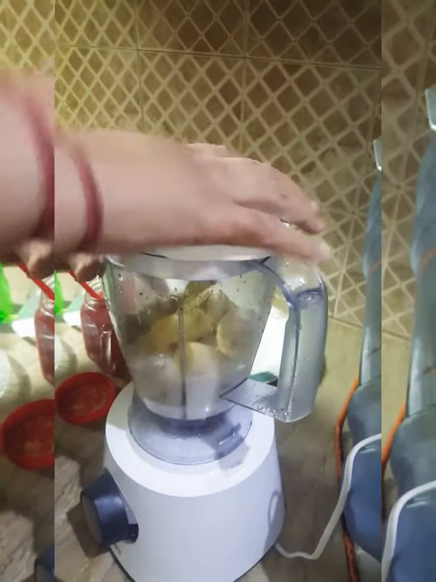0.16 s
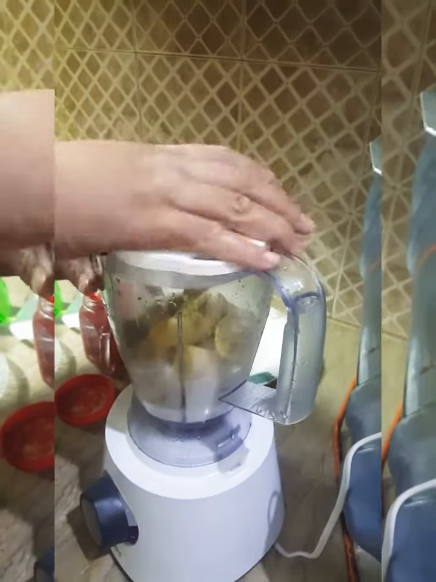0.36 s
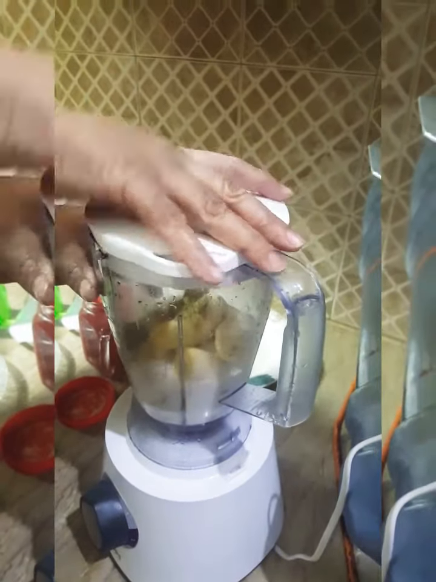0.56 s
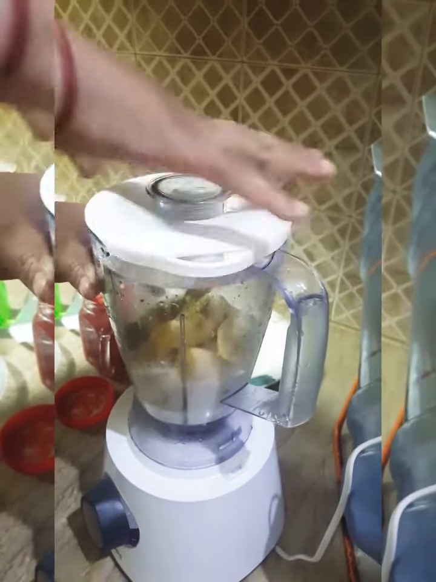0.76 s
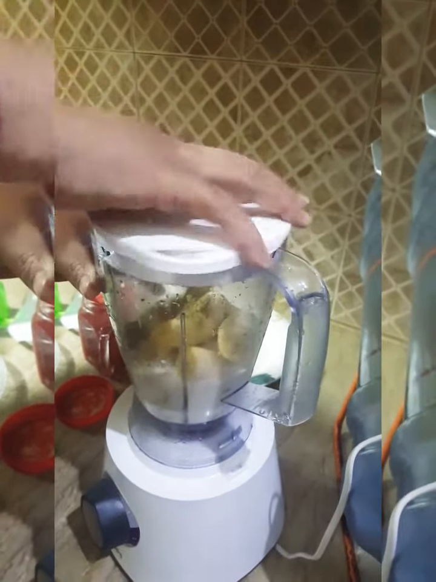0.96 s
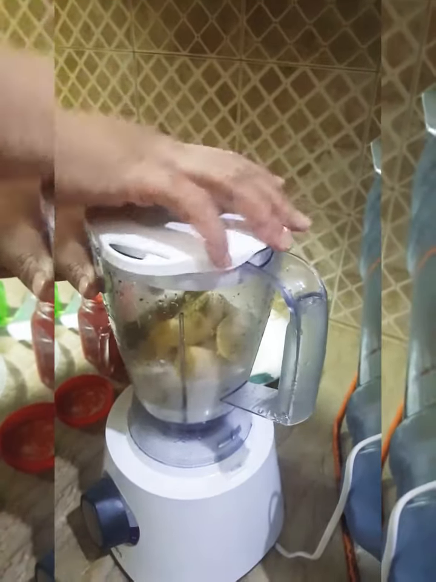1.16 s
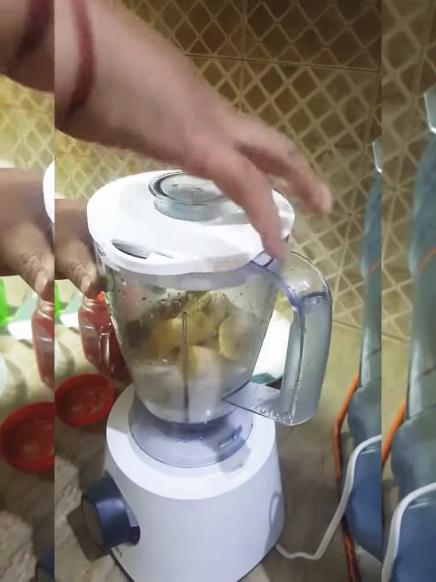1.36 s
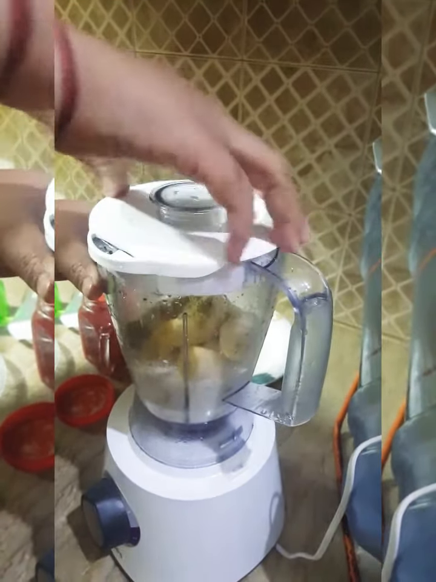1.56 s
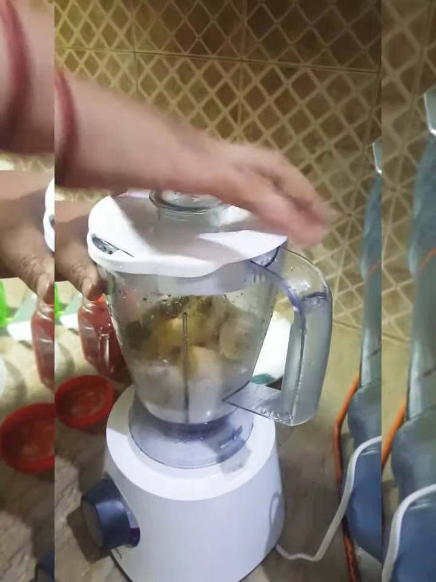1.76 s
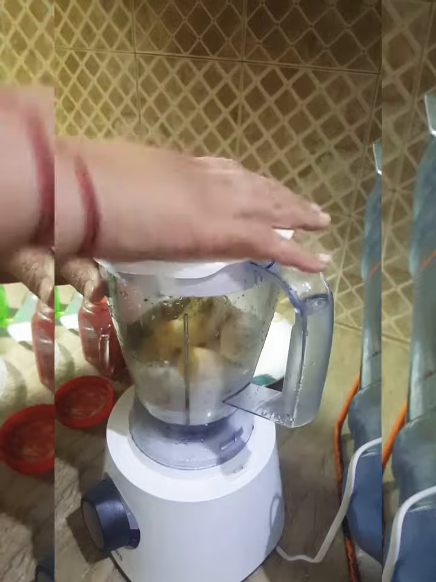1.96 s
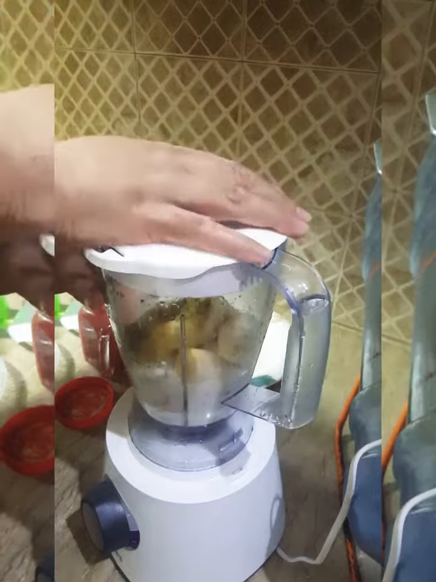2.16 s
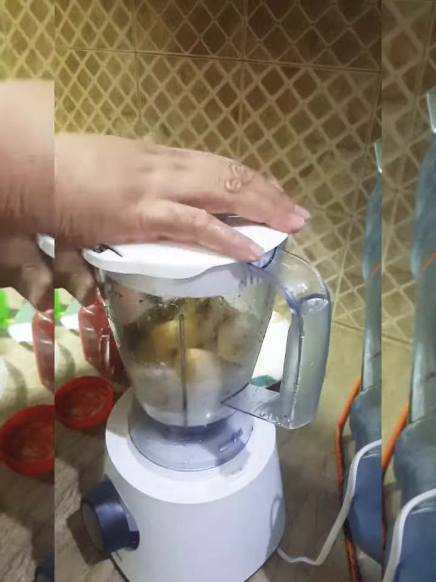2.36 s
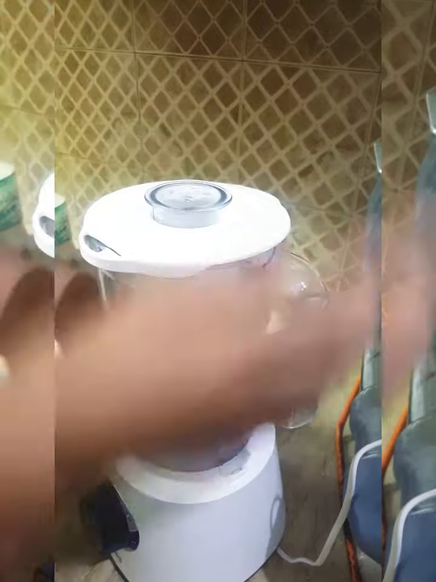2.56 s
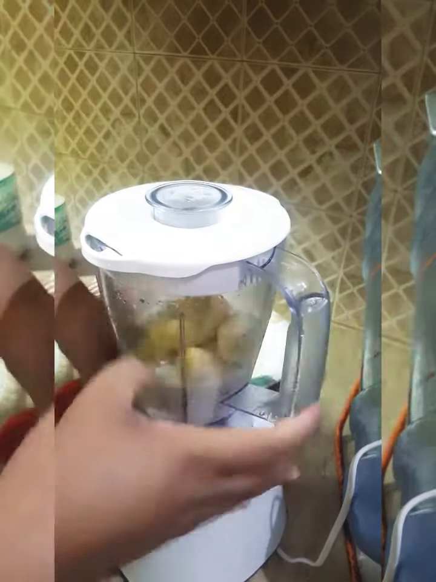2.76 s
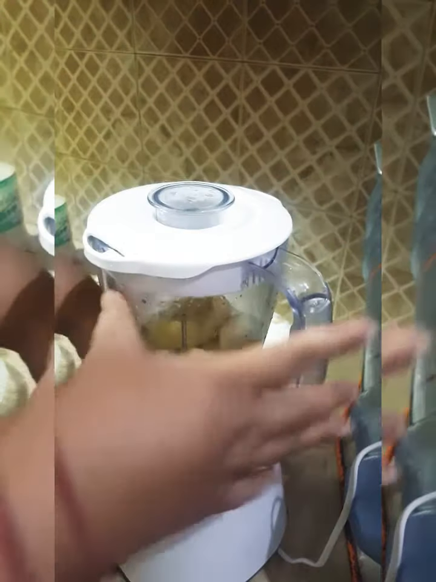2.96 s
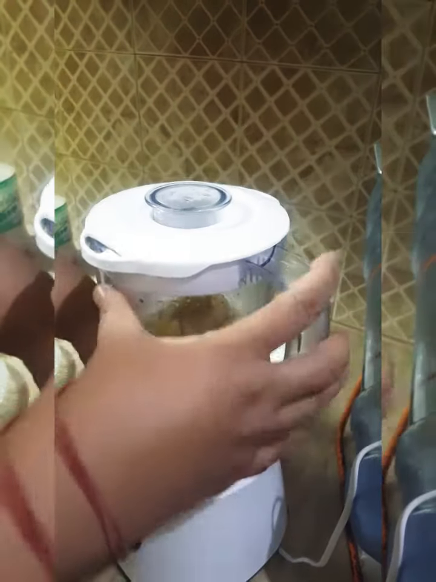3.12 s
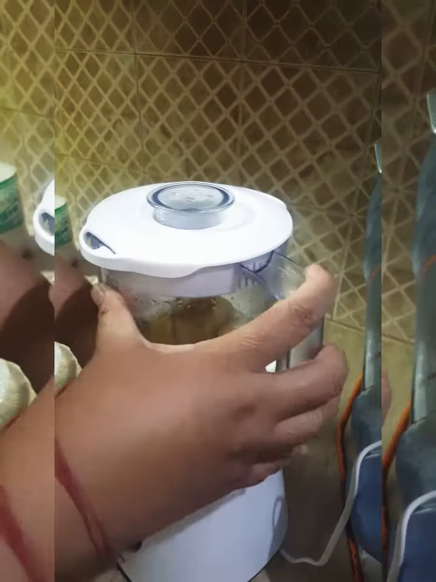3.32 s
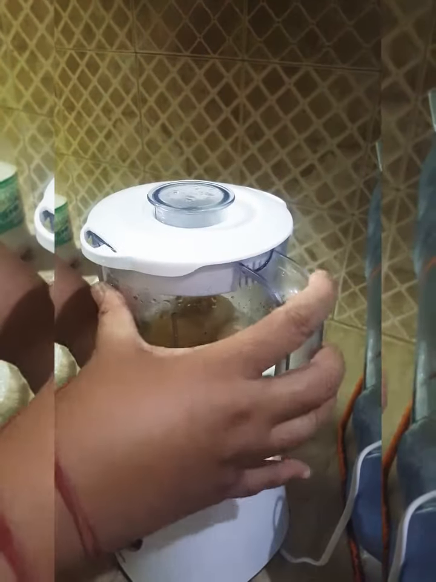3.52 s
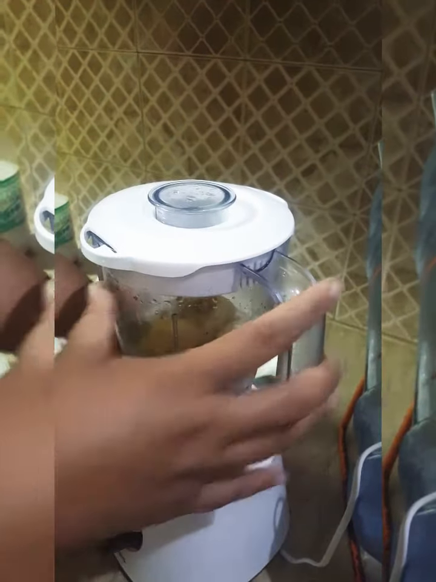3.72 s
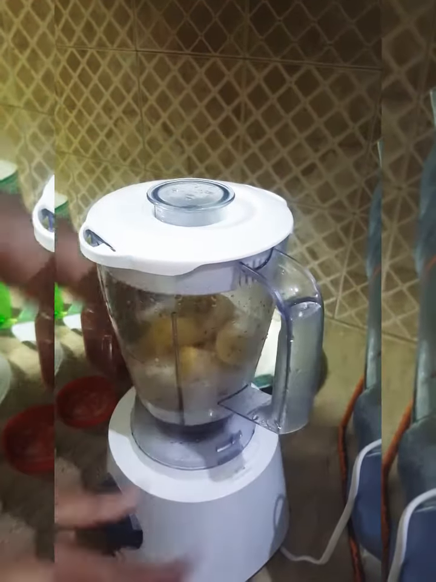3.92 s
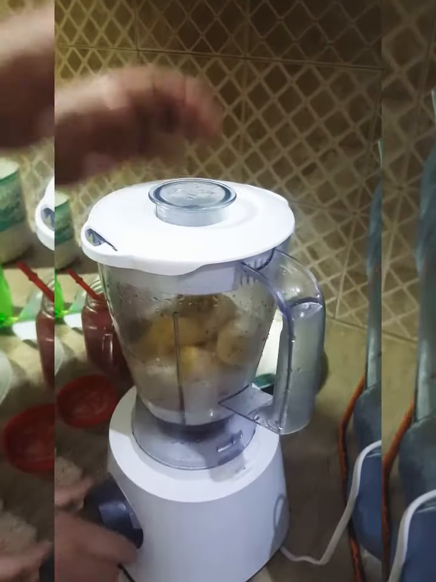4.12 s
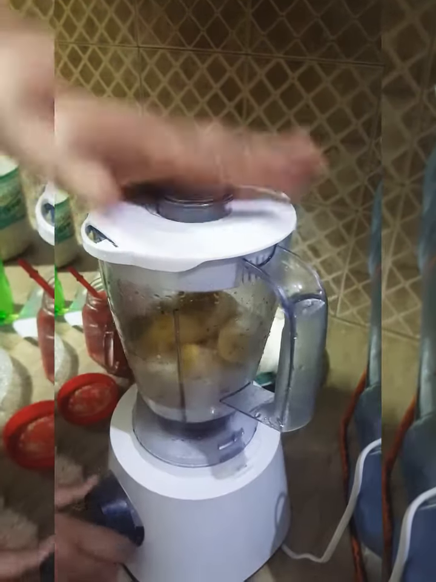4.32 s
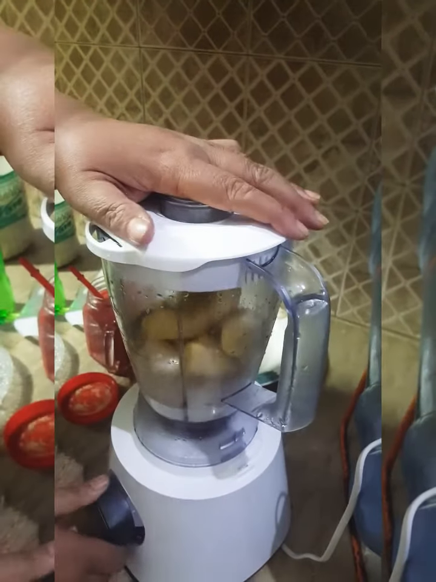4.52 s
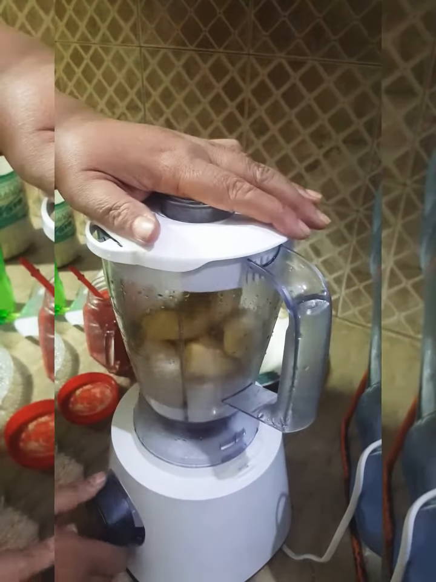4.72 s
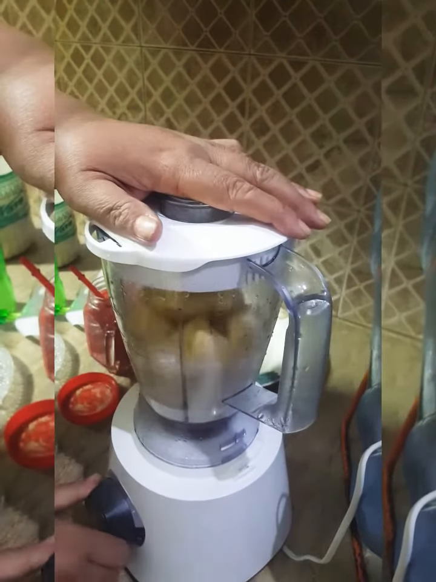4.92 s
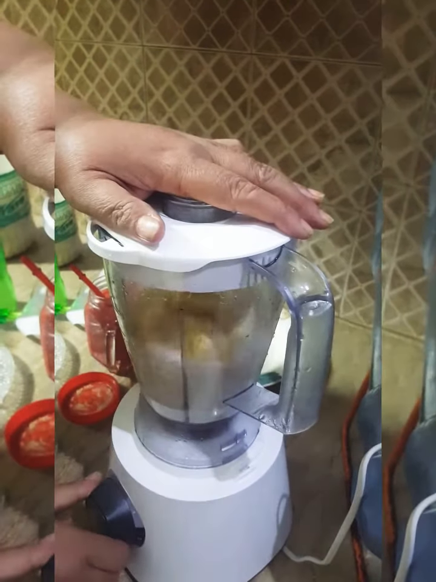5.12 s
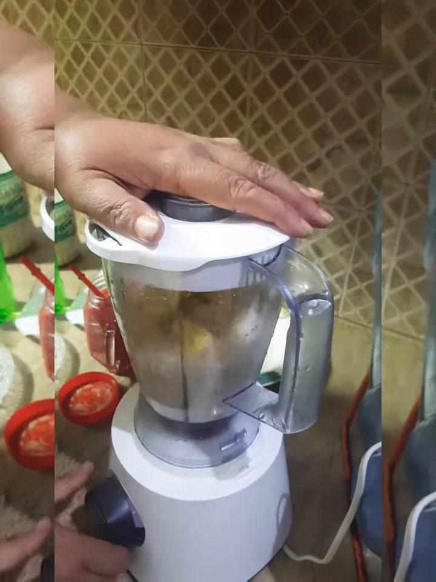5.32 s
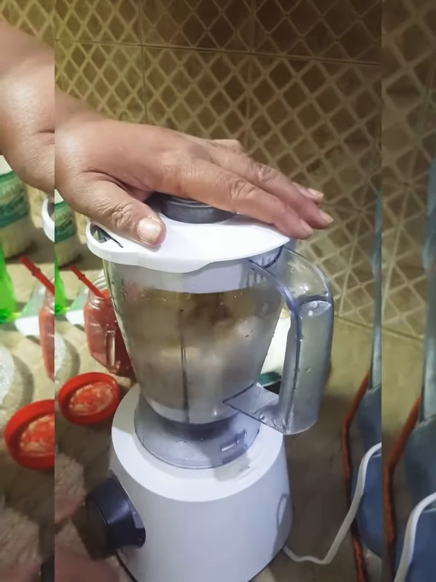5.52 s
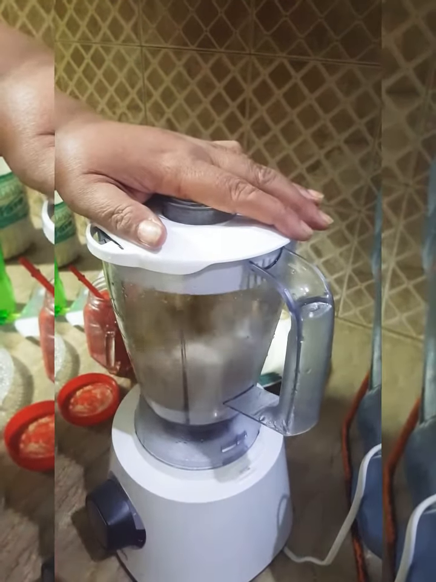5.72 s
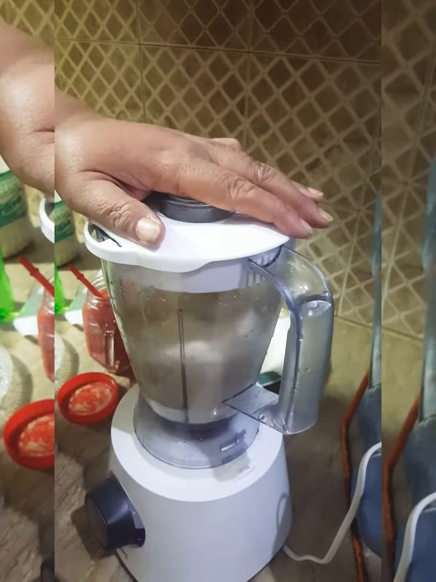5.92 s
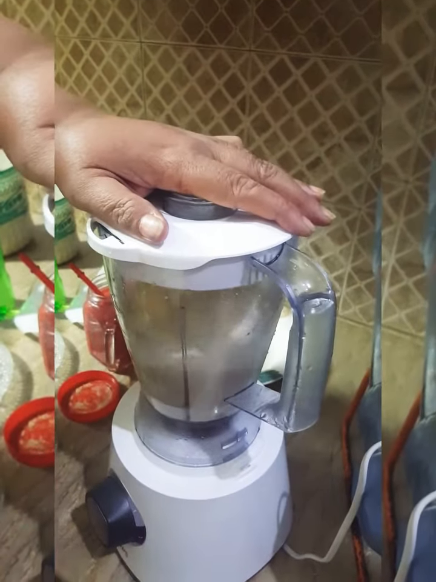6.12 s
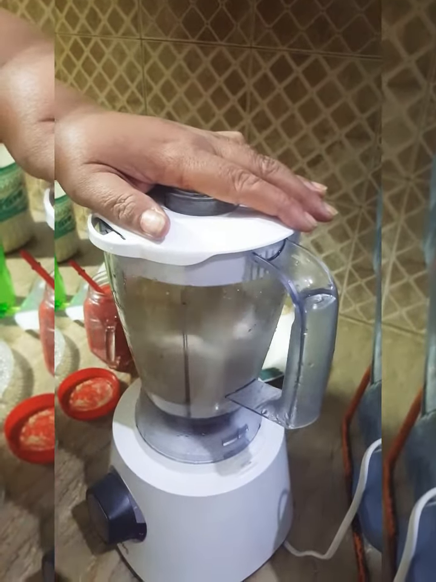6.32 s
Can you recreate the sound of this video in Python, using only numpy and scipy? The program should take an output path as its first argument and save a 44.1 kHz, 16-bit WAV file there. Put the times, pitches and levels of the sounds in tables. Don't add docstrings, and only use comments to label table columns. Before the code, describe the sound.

A low, faint fridge hum and soft room air run underneath in a small tiled kitchen, heard closely in stereo with a short bright echo. From 0.3 to 1.2 seconds, fingers tap and scuff a plastic lid unevenly, the firmest tap near 1.1. More light taps and rubs come around 1.5 to 1.65 and at 2.1, with tiny nail ticks between and a small tap at 2.9. At 3.4 the jar locks with a loud, hollow clack and brief rattle. After quiet, knob clicks cluster at 4.35 to 4.55. At 4.8 the blender motor jerks up with a harsh bite, sags and almost goes silent by 5.05, then restarts, growling and climbing. From 5.4 it roars fully, with shaft hum, piercing brush whine and irregular chunk knocks, pitch rising slightly until about 6.05, then easing down while it is still running loud at the end, about 6.4.

```python
import sys
import numpy as np
from scipy import signal
from scipy.fft import rfft, irfft
from scipy.io import wavfile
from scipy.ndimage import uniform_filter1d, map_coordinates

SR = 44100
rng = np.random.default_rng(int(sys.argv[2]) if len(sys.argv) > 2 else 0)


def master_out(mix):
    frames = np.transpose(np.atleast_2d(mix))
    ceiling = np.clip(frames, -1, 1)
    pcm = np.round(ceiling * 32767).astype(np.int16)
    wavfile.write(sys.argv[1], SR, pcm)


def ratio_of_db(decibels):
    return 10 ** (np.asarray(decibels, float) / 20)


N = 281358
T = np.arange(N) / SR

# time_s, bar_rate_hz
FIRST_JERK_SPEED = [
    (4.78, 1470),
    (4.92, 3483),
    (5.05, 2493),
]
RUN_SPEED = [(5.14, 4600), (5.28, 5150), (5.36, 6150), (5.42, 6750), (5.5, 6910), (5.87, 6860),
             (5.95, 7200), (6.04, 7370), (6.15, 7300), (6.21, 6950), (6.28, 6750), (6.38, 6540)]
# time_s, roar_db, strain (0 to 1)
FIRST_JERK_LOAD = [
    (4.786, -32.5, 0.67),
    (4.888, -23, 0.73),
    (4.928, -23.5, 0.76),
    (5.038, -44.5, 0.94),
    (5.056, -49, 0.67),
]
RUN_LOAD = [
    (5.074, -27.5, 0.65),
    (5.268, -23, 0.84),
    (5.335, -25, 0.18),
    (5.384, -21, 0.049),
    (5.63, -20.5, 0.43),
    (5.8, -21.5, 0.26),
    (5.96, -22, 0.32),
    (6.27, -20.5, 0.17),
    (6.38, -22, 0.32),
]
# multiple of the shaft rate, level_db
SHAFT_TONES = [(1, -2), (2, -14.5), (3, -33), (4, -19.5), (5, -29), (6, -10), (8, -15), (9, -12.5),
               (11, -14), (13, -17), (15, -19)]
# multiple of the bar rate, level_db
WHINE_TONES = [(.5, -8), (1, 1.5), (1.5, -10.5), (2, -12)]
# pitch_hz, level_db
WHINE_COLOUR = [(4500, -30), (6200, -18), (6750, -3), (7400, -3), (8200, -6), (9300, -14), (11000, -6),
                (13500, 0), (15000, -6)]
# pitch_hz, level_db (per Hz)
ROAR_COLOUR = [(30, -64), (95, -15), (189, -5.5), (450, -8.5), (650, -4), (844, -2.5), (988, -5),
               (1320, -3), (2200, -9.5), (3500, -16.5), (6000, -26), (8000, -31.5), (9700, -43.5),
               (11500, -39.5), (14000, -35.5), (14800, -43), (15100, -70)]
# pitch_hz, width_hz, level_db
HOUSING_RINGS = [(433, 12, 8), (870, 190, -12), (1120, 230, -13), (2190, 420, 8.5)]
# time_s, rasp_db, hiss_db
LUMPS = [
    (4.79, 3.5, 5.5),
    (5.082, -1, 1.5),
    (5.385, 1.5, 0),
    (5.493, 4.5, -1.5),
    (5.878, 3.5, 0),
    (5.95, -5, 0),
    (6.18, 3.5, -0.5),
]
# time_s, pitch_hz, length_s, level_db
CHUNKS = [(4.946, 263, 0.018, -27), (5.108, 265, 0.02, -31), (5.173, 248.4, 0.023, -27),
          (5.219, 1180, .015, -24), (5.262, 224, 0.027, -26.5), (5.248, 380, 0.031, -25),
          (5.353, 730, 0.032, -37), (5.406, 1330, 0.031, -25), (5.407, 826, 0.051, -27),
          (5.502, 2030, 0.037, -21), (5.629, 263, 0.031, -27.5), (5.63, 860, 0.029, -31),
          (5.752, 720, 0.045, -30.5), (5.782, 1240, 0.079, -24), (5.833, 1070, 0.021, -27.5),
          (5.9, 1460, 0.034, -29), (6.06, 1240, 0.02, -25.5), (6.143, 1900, 0.011, -23),
          (6.152, 754, .015, -34), (6.177, 1300, 0.0088, -30), (6.225, 1890, 0.0098, -33),
          (6.297, 790, 0.011, -25), (5.42, 260, 0.06, -31.5), (6.217, 810, 0.022, -20),
          (6.263, 1300, .015, -35), (6.33, 1980, 0.011, -20), (6.346, 263, 0.038, -20.5)]
# start_s, peak_db
CLACK_BLOWS = [
    (3.3866, -17),
    (3.3876, 0),
    (3.3985, -10),
    (3.409, -13),
]
# pitch_hz, width_hz, level_db
JAR_RINGS = [(172, 70, -18), (256, 60, 0), (393, 69, -6), (486, 140, -9), (620, 99, 12.5), (710, 110, 13),
             (860, 150, 0), (1300, 76, 3), (1830, 120, 12.5), (2030, 120, 11.5), (2320, 90, 4),
             (2760, 100, 10), (3140, 250, 8), (4370, 400, 10)]
# pitch_hz, level_db (per Hz)
RATTLE_COLOUR = [(60, -46), (130, 4), (260, -13), (450, -10), (720, -3.5), (900, -0.5), (1200, -7),
                 (1550, -12), (1950, -3.5), (2860, -9), (3540, -14), (5650, -21.5), (10200, -37.5),
                 (16000, -40)]
# start_s, peak_db, pitch_hz, thud_db, tick_db
LID_TAPS = [(0.322, -38, 1880, 4, -7), (0.35, -21.5, 670, -4, -1), (0.364, -22.5, 665, -7, -40),
            (0.511, -17.5, 1770, -9, -13), (0.6455, -19.5, 1950, -4, -15), (0.742, -38, 630, 4, -4),
            (0.772, -19.5, 1300, -28, -32), (0.889, -20.5, 1500, -2, -44), (0.975, -29.5, 1890, 3.5, -3),
            (1.012, -30, 1530, -4, -1), (1.018, -35.5, 1500, -2, 7), (1.036, -36, 1500, 5, -5),
            (1.108, -13.5, 1400, -9.5, -28), (1.164, -27, 1310, -2.5, -29), (1.507, -20, 1190, -32, -16),
            (1.538, -40, 1200, -8, -5), (1.56, -24.5, 1350, -1, -6.5), (1.576, -33, 603, -21, 9.5),
            (1.611, -33, 770, 11, -22), (1.626, -22.5, 1470, -7, -40), (2.088, -17, 684, -22, -15),
            (2.09, -28.5, 2100, -22, -21), (2.629, -45, 638, -9, 1), (2.905, -24, 2430, -26, -0.5)]
# start_s, peak_db, pitch_hz, thud_db, tick_db
KNOB_CLICKS = [(4.361, -32, 600, -9, -29), (4.423, -31.5, 4560, -3, -6), (4.424, -27, 3270, -4, -20),
               (4.472, -11, 985, -32, -13), (4.479, -14, 1830, -30, -16), (4.486, -12.5, 1490, -33, -30),
               (4.4865, -9.5, 1960, -32, -23), (4.508, -23, 1950, -30, -30), (4.518, -24, 2100, -32, -30),
               (4.494, -10, 945, -9.5, -28), (4.504, -18, 1050, -11, -25), (4.513, -17, 775, -11, -27),
               (4.522, -19.5, 680, -24, -25), (4.53, -22, 603, -1, -25), (4.787, -15, 710, -20, -46),
               (5.066, -15.5, 704, -1.5, -22)]
# pitch_hz, level_db
LID_RINGS = [(1290, -20), (2270, -18.5), (2590, -35.5), (3600, -25)]
# loudest_s, level_db, swell_s, fade_s, hiss_db
RUBS = [(0.324, -51.5, 0.25, 0.025, -5), (0.353, -33, 0.0052, 0.046, -2), (0.488, -55, 0.039, 0.095, 3),
        (0.511, -64, 0.0035, 0.026, -26), (0.759, -45.5, 0.043, 0.017, -12),
        (0.774, -31, 0.0028, 0.027, -19), (0.891, -29, 0.0015, 0.013, -28),
        (0.976, -49.5, 0.022, 0.37, -10), (1.509, -44, 0.0033, 0.009, -6), (1.622, -40, 0.18, 0.045, -13),
        (2.025, -51.5, .006, 0.028, -6), (2.08, -56.5, .04, 0.019, 3), (2.091, -41, 0.0028, 0.02, -21),
        (2.903, -39.5, 0.026, 0.025, -9), (3.355, -48.5, .008, 0.037, -0.5), (4.364, -56, .01, 0.025, -20),
        (4.455, -59, 0.21, 0.01, -20), (4.472, -33, 0.0022, 0.037, 2.5), (4.515, -29, 0.072, 0.028, -28)]
# start_s, peak_db, pitch_hz
TICKS = [(0.974, -43, 2500), (1.359, -58, 6800), (1.492, -58.5, 7000), (1.546, -45, 8200),
         (1.668, -45, 6530), (1.792, -44.5, 7000), (2.562, -52, 4800), (2.8, -55, 4500), (2.839, -49, 5500),
         (2.899, -45, 5000), (2.908, -44, 6500)]
# middle_s, pitch_hz, length_s, level_db
THUMPS = [
    (0.78, 160, 0.016, -41.5),
    (0.889, 90, 0.017, -39.5),
    (1.57, 121, 0.011, -37),
    (1.623, 101, 0.016, -34),
    (3.41, 153, 0.023, -38),
    (3.13, 280, 0.022, -48),
    (3.405, 279, 0.016, -30.5),
]
# multiple of its turning rate, level_db, waver_db
FRIDGE_TONES = [(0.99, -72, 1), (3.98, -49.5, 2.5), (5.04, -53, 1), (8.1, -70, 1), (10.24, -66, 1),
                (11.7, -58, 2), (15.83, -51, 1.3), (19.8, -52.5, 1), (21.85, -66, 1)]
# pitch_hz, level_db (per Hz)
AIR_COLOUR = [(20, -9), (44, -13), (101, 6.5), (160, -6), (285, -3.5), (499, -7.5), (607, -11.5),
              (1900, -21), (2200, -18.5), (2900, -22.5), (3300, -30), (8200, -40.5), (9500, -50),
              (13000, -45.5), (16000, -41.5)]
# pitch_hz, level_db
WALL_COLOUR = [(100, 2.5), (450, 0.5), (800, -2), (1500, -3), (3000, -2.5), (8000, -2.5)]
# pitch_hz, left_minus_right_db
PORT_COLOUR = [(60, 3.5), (110, 1.5), (200, 3), (380, -1.5), (700, 2), (1290, 5), (2380, 3), (4400, -1),
               (8120, 7), (15000, -2)]

SIDES = np.array([[1], [-1]])


def level(x, db):
    return x * ratio_of_db(db) / np.sqrt(np.mean(x ** 2))


def noise():
    return rng.standard_normal(N)


def grains(spread_db, longest, share):
    loudness = ratio_of_db(spread_db * rng.exponential(size=N).clip(0, longest))
    return noise() * loudness * (rng.random(N) < share)


def band(x, lo_hz, hi_hz):
    return signal.sosfilt(signal.butter(2, [lo_hz, min(hi_hz, .45 * SR)], "band", fs=SR, output="sos"), x)


def high(x, hz):
    return signal.sosfilt(signal.butter(4, hz, "high", fs=SR, output="sos"), x)


def ring(x, hz, t60):
    r, w = np.exp(-np.log(1000) / (t60 * SR)), 2 * np.pi * hz / SR
    return signal.lfilter([0, np.sin(w)], [1, -2 * r * np.cos(w), r * r], x)


def colour(x, table):
    hz, db = np.transpose(table)
    f = np.arange(x.shape[-1] // 2 + 1) * SR / x.shape[-1]
    gain = ratio_of_db(np.interp(np.log(f + 1), np.log(hz + 1), db))
    return irfft(rfft(x) * gain, x.shape[-1])


def walk(rate):
    k = int(SR / rate)
    steps = np.repeat(rng.standard_normal(N // k + 1), k)
    return 1.23 * uniform_filter1d(uniform_filter1d(steps, k), k)[:N]


def curves(table):
    s, *columns = np.transpose(table)
    inside_s = np.minimum(T - s[0], (s[-1] + .008 - T) / 4)
    gate = np.clip(inside_s / .0015, 0, 1)
    return [gate] + [np.interp(T, s, c) for c in columns]


def patchy(x, patchy_db, rate):
    hz, s, spec = signal.stft(x, SR, nperseg=1024)
    place = np.meshgrid(2 * np.log2(hz / 30 + 1), s * rate, indexing="ij")
    patches = map_coordinates(rng.standard_normal((22, 400)), place, order=1, mode="wrap")
    return signal.istft(spec * ratio_of_db(1.4 * patchy_db * patches), SR)[1][..., :N]


def motor():
    bars_per_turn = 48
    gate, _, strain = load()
    _, bar_hz = curves(FIRST_JERK_SPEED + RUN_SPEED)
    shaft_hz = bar_hz / bars_per_turn
    octaves = np.log2(bar_hz / 6900)
    turn = 2 * np.pi * np.cumsum(shaft_hz * (1 + 0.00283 * walk(30))) / SR
    roar = churn(turn) + ratio_of_db(-0.5) * band(churn(turn), 760, 18000) * SIDES
    whine = brush_whine(turn, bars_per_turn, octaves)
    shaft = shaft_hum(turn, shaft_hz, octaves, strain)
    return gate * (roar + np.array([whine, np.roll(whine, 2)])), high(gate * shaft, 113)


def load():
    return curves(FIRST_JERK_LOAD + RUN_LOAD)


def churn(turn):
    _, roar_db, strain = load()
    s, lump_rasp_db, lump_hiss_db = np.transpose(LUMPS)
    lump_s = 0.059
    caught = np.exp(-((T[:, None] - s) / lump_s) ** 2)
    growl_db = -13.5 + 18.5 * strain
    rasp_db = -8.5 + caught @ lump_rasp_db
    hiss_db = -11 + caught @ lump_hiss_db

    turbulence = noise() * (1 + 0.036 * np.cos(turn)) * ratio_of_db(1.0 * walk(90))
    chop = turbulence + 0.73 * grains(4.5, 3.5, .05)
    body = sum(ratio_of_db(db) * level(ring(chop, hz, 5.8 / width), -26.5) for hz, width, db in HOUSING_RINGS)
    roar = patchy(level(colour(chop, ROAR_COLOUR), 0) + body, patchy_db=1.7, rate=22)
    roar = roar / band(roar, 460, 1730).std()

    growl = colour(roar, [(120, -20), (180, 0), (330, 0), (600, -30)])
    rasp = colour(roar, [(1500, -40), (1800, 0), (2400, 0), (2800, -40)])
    hiss = colour(roar, [(2400, -40), (2800, 0)])
    mix = roar + (ratio_of_db(growl_db + 8.0) - 1) * growl
    mix = mix + (ratio_of_db(rasp_db + 8.0) - 1) * rasp + (ratio_of_db(hiss_db + 10.5) - 1) * hiss
    return ratio_of_db(roar_db - 1.5) * mix


def brush_whine(turn, bars_per_turn, octaves):
    bars = bars_per_turn * turn + 1.0 * np.sin(turn) + 1.3 * walk(250)
    whine = 0
    for k, db in WHINE_TONES:
        loudness = ratio_of_db(db + 2.5 * walk(150) + 3.5 * walk(30)) * (1 + .5 * np.cos(turn))
        whine = whine + loudness * np.cos(k * bars + k ** 2 * .3 * walk(600))
    whine_db = -40 - 3 * np.minimum(octaves, 0)
    return ratio_of_db(whine_db + 4) * colour(whine, WHINE_COLOUR)


def shaft_hum(turn, shaft_hz, octaves, strain):
    swirl_hz, swirl_s, swirl_ends_s = 6.5, 5.47, 5.95
    swirl = np.cos(2 * np.pi * swirl_hz * (T - swirl_s)) * np.clip((swirl_ends_s - T) / 0.17, 0, 1)
    base_hz, base_width_hz = 154, 6
    rocking = np.exp(-((shaft_hz - base_hz) / base_width_hz) ** 2)
    shake_db = -32 + 4.5 * octaves + 0.5 * strain + 2.5 * swirl + 10 * rocking
    hum = 0
    for k, db in SHAFT_TONES:
        waver_db = (2.0 + 0.17 * k) * min(k / 3.2, 1) * walk(22)
        phase = k * turn + 0.27 * (k - 1) * walk(60) + rng.uniform(0, 2 * np.pi)
        hum = hum + ratio_of_db(db + waver_db) * np.cos(phase)
    return ratio_of_db(shake_db + 4.5) * hum


def chunks():
    knocks = high(grains(3, 5, .03), 170)
    out = 0
    for s, hz, length_s, db in CHUNKS:
        out = out + level(ring(knocks, hz, 14 / hz), db) * np.exp(-((T - s) / length_s) ** 2)
    return out


def clack():
    blow = sum(ratio_of_db(db) * np.exp(-np.maximum(T - s, 0) / 0.00022) * (T >= s) for s, db in CLACK_BLOWS)
    blow = blow * (1 + .2 * noise())
    body = sum(ratio_of_db(db) * ring(blow, hz, 4.1 / width) for hz, width, db in JAR_RINGS)
    since_snap = np.maximum(T - CLACK_BLOWS[1][0], 0)
    rattle = colour(noise(), RATTLE_COLOUR) * np.exp(-since_snap / 0.016) * np.clip(since_snap / 0.00067, 0, 1)
    rattle_db = -5
    mix = body / np.abs(body).max() + ratio_of_db(rattle_db) * rattle / np.abs(rattle).max()
    return ratio_of_db(-2.5) * high(mix, 146)


def taps(table, pan_db, t60):
    out, t = np.zeros((2, N)), T[:SR // 4]
    for s, db, hz, thud_db, tick_db in table:
        fade_s = np.array([[0.22 * t60], [.012]])
        burst, knock = rng.standard_normal((2, len(t))) * np.exp(-t / fade_s)
        burst[:4] += 2.5
        parts = [
            (band(burst, hz / 1.75, hz * 1.47), -6),
            (ring(burst, hz, 0.58 * t60), -5.5),
            (band(burst, 500, 2200), -12),
            (band(burst, 2000, 6300), tick_db + 0.5),
            (band(knock, 146, 318), thud_db)]
        for ring_hz, ring_db in LID_RINGS:
            parts.append((ring(burst, ring_hz, 0.53 * t60), ring_db + 3 * rng.standard_normal()))
        tap = sum(ratio_of_db(part_db) * x / np.abs(x).max() for x, part_db in parts)
        i = int(s * SR)
        out[:, i:i + len(t)] += tap * ratio_of_db(db - 7.5 + np.array([[pan_db], [6.5 - pan_db]]) / 2)
    return out


def rubs():
    slips = grains(2.4, 5, .15)
    mid = level(band(slips, 350, 2720), -0.54)
    low = level(band(noise(), 129, 290), -1.5)
    top = level(band(slips, 950, 7000), -2.0) + level(band(slips, 8100, 13500), -10.5)
    out = 0
    for s, peak_db, swell_s, fade_s, hiss_db in RUBS:
        away = np.where(T < s, (s - T) / swell_s, (T - s) / fade_s)
        db = peak_db - 27 * away
        touch = np.clip(4 - 3 * away, 0, 1)
        rumble_db = -43 + 0.69 * (db + 43.5)
        out = out + ratio_of_db(db) * (mid + ratio_of_db(hiss_db) * top) + touch * ratio_of_db(rumble_db) * low
    return out


def ticks():
    out, t = np.zeros(N), T[:SR // 20]
    for s, db, hz in TICKS:
        scratch = rng.standard_normal(len(t)) * np.exp(-t / 0.0022)
        tick = band(scratch, hz / 1.7, hz * 1.25)
        i = int(s * SR)
        out[i:i + len(t)] += ratio_of_db(db) * tick / np.abs(tick).max()
    return out


def thumps():
    out = 0
    for s, hz, length_s, db in THUMPS:
        swell = np.exp(-((T - s) / length_s) ** 2)
        out = out + ratio_of_db(db + 0.5) * np.sin(2 * np.pi * hz * (T - s)) * swell
    return out


def fridge():
    turn = 2 * np.pi * 25.09 * T
    hum = 0
    for k, db, waver_db in FRIDGE_TONES:
        phase = k * turn + 0.023 * waver_db * walk(5.1) + rng.uniform(0, 2 * np.pi)
        hum = hum + ratio_of_db(db + 2.5 + waver_db * walk(9)) * np.cos(phase)
    mid, side = (patchy(colour(noise(), AIR_COLOUR), patchy_db=1.0, rate=6) for _ in range(2))
    air = mid + (high(side, 460) + ratio_of_db(-17.5) * side) * SIDES
    air_db = -40
    far = hum + level(air, air_db - 6)
    return np.array([far[0], np.roll(far[1], 6)])


def kitchen(x):
    t60_s, tail_db = 0.23, 2.5
    t = T[:SR // 2]
    rise = np.clip(t / 0.006, 0, 1)
    spec = rfft(rng.standard_normal((2, len(t))) * np.exp(-np.log(1000) * t / t60_s) * rise)
    even = spec / np.sqrt(uniform_filter1d(np.abs(spec) ** 2, size=25, axis=1))
    mid, side = irfft(even, len(t)) * np.sqrt(rise) * (t < .4)
    tail = colour(mid + high(side, 330) * SIDES, WALL_COLOUR)
    tail = tail * ratio_of_db(tail_db) / np.sqrt(np.sum(mid ** 2) * 2)
    return signal.fftconvolve(x[None], tail * (t < .4), axes=1)[:, :N]


def scene():
    roar, shaft = motor()
    shaft = shaft + chunks()
    snap = clack()
    lid = taps(LID_TAPS, pan_db=9.5, t60=0.023)
    knob = taps(KNOB_CLICKS, pan_db=5.5, t60=0.027)
    hands = lid + knob + rubs() + ticks() + thumps()
    into_room = ratio_of_db(-2.5) * hands.mean(axis=0) + ratio_of_db(-3.0) * snap + ratio_of_db(-7) * roar[0] + ratio_of_db(-6.0) * shaft
    return hands + snap + roar + shaft + kitchen(into_room) + fridge()


def roll_off(x):
    return signal.sosfilt(signal.butter(12, 15950, fs=SR, output="sos"), x)


def record(dry):
    top_hz = 15900
    heard = signal.sosfilt(signal.ellip(6, .3, 60, top_hz, fs=SR, output="sos"), dry)
    left = colour(heard[0], [(hz, db / 2) for hz, db in PORT_COLOUR])
    right = colour(heard[1], [(hz, -db / 2) for hz, db in PORT_COLOUR])
    mix = np.tanh(0.62 * np.array([left, right])) / 0.58
    return roll_off(mix)


dry = scene()
out = record(dry)
master_out(out)
```